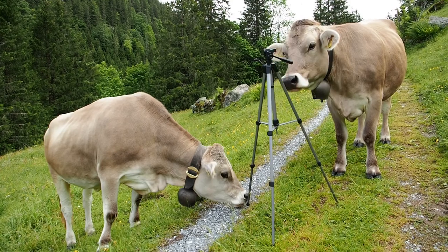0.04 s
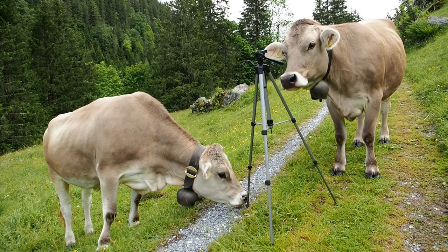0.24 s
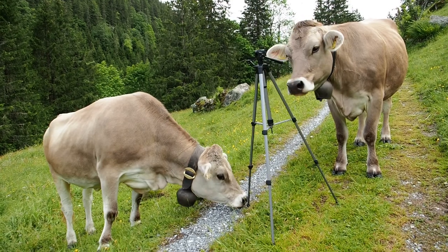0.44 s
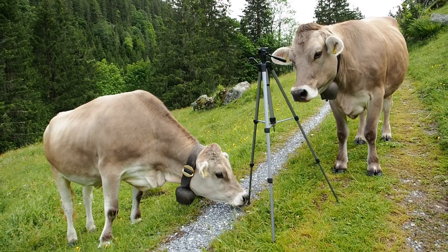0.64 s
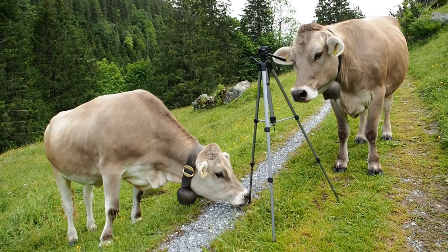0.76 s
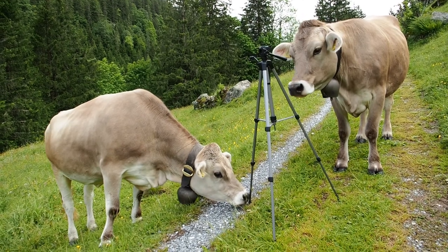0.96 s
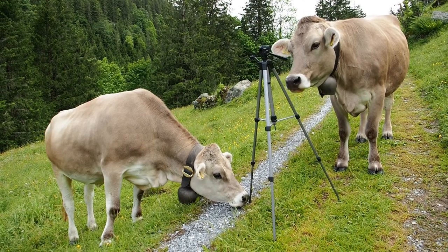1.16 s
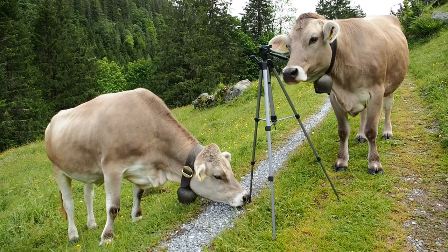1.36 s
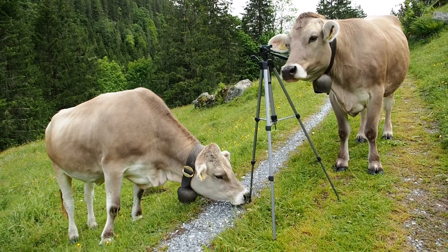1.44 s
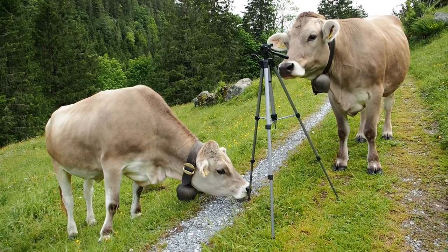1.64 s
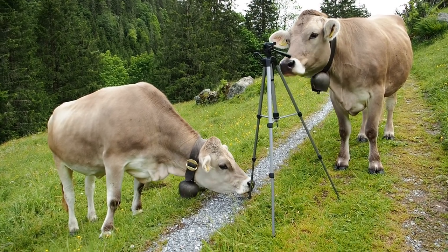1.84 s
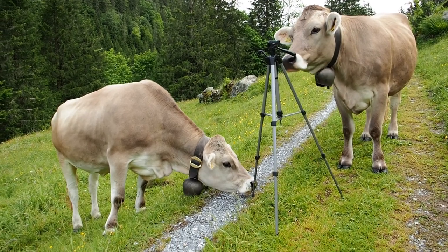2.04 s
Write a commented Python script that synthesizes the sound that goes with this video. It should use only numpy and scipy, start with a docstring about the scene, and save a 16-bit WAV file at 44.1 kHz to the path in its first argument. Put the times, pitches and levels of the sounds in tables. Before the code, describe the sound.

Close by on an open pasture, a cowbell on a grazing cow gives six irregular clangs, the first ones strongest. Its clear ring lingers and fades over faint rustling grass, a light clapper tick and soft outdoor air.

```python
"""Cowbell on a mountain pasture

A sheet-metal bell swings on a grazing cow's neck, close by and a little to the right. The clapper lands
six times, each time on another spot: a knock, a beating hum, long clear partials and a bright shimmer.
A faint tick follows, and the muzzle rustles in the grass. A gain control ducks the soft rush of
open air at the first clang and slowly lets it back."""
import sys
import numpy as np
from scipy import signal
from scipy.fft import rfft, irfft
from scipy.io import wavfile
from scipy.ndimage import uniform_filter1d, minimum_filter1d

SR = 44100
rng = np.random.default_rng(int(sys.argv[2]) if len(sys.argv) > 2 else 0)


def generate_wav(signal):
    """Clip the signal to [-1, 1] and save it as 16-bit WAV at the path in sys.argv[1]."""
    frames = np.transpose(np.atleast_2d(signal))
    scaled = np.clip(frames, -1, 1) * 32767
    pcm = np.round(scaled).astype(np.int16)
    wavfile.write(sys.argv[1], SR, pcm)


N = 92610
T = np.arange(N) / SR

# Colour of the open air: (frequency [Hz], density [dB])
AIR_SPECTRUM = [(25, -17), (60, -4), (150, -2), (220, -3), (320, -11), (800, -8), (1600, -12),
                (3200, -16.5), (6000, -28), (10000, -34), (16000, -35)]
# The muzzle's pushes through the grass: (centre time [s], half-length [s], level [dB])
GRASS_RUSTLES = [(.078, 0.016, -45.5), (.15, 0.043, -50), (1.366, 0.044, -47), (1.588, 0.024, -48.5),
                 (1.732, 0.04, -51.5), (1.847, .035, -59), (2.085, 0.022, -55)]
# Colour of the grass blades: (frequency [Hz], density [dB])
GRASS_SPECTRUM = [(1500, -27), (3500, 3), (4300, 2), (7000, -4.5), (11500, -5.5), (16000, -19)]
# Clapper blows and how hard each drives the mode families: (time [s], low hum [dB], high hum [dB],
# prime [dB], second [dB], twin [dB], third [dB], edge [dB], shimmer [dB], knock [dB])
CLAPPER_BLOWS = [(0.2087, 0, -0.5, 2.5, 0.5, -19, 3, -12.5, -7.5, 0.5),
                 (0.4251, -5, -2, -0.5, -3.5, -15, -1.5, -11.5, -10.5, 4),
                 (0.6866, -11, -29, -3.5, -7.5, -15.5, -12.5, -15, -24, -18),
                 (0.8803, -20.5, -2, -5.5, -9, -20.5, -12.5, -19.5, -20, -7.5),
                 (1.1307, -9, -10.5, -6.5, -14, -9.5, -3, -13.5, -18, -11),
                 (1.4360, -12, -16.5, -12.5, -18.5, -17.5, -6, -24, -24.5, -27.5)]
# The bell's mode families, in the order of the level columns above: (name)
MODE_FAMILIES = ["low hum", "high hum", "prime", "second", "twin", "third", "edge", "shimmer", "knock"]
# Families that keep their phase from blow to blow: (name)
RINGING_FAMILIES = ["prime", "second", "twin", "third"]
# The bell's modes: (family, frequency [Hz], level [dB], t60 [s], left minus right [dB])
BELL_MODES = [ ("low hum", 448.3, 0, 0.52, -4.5), ("high hum", 463, 0, 0.53, -4.5),
              ("prime", 1150.5, 0, 4.18, 0), ("edge", 1199.6, -6, 2.7, 1), ("shimmer", 1254.5, 1, 0.19, 0),
              ("second", 2135.1, 0, 3.5, 0), ("twin", 2174.5, -1.2, 2.55, 2.6),
              ("knock", 640, -10, 0.018, -1), ("knock", 905, -9.5, 0.015, -1),
              ("knock", 2507, -21.5, 0.11, -2), ("knock", 3313.5, -16, .9, -5),
              ("third", 3377.2, 0, 1.077, -7), ("shimmer", 3930, -14, 0.11, -2),
              ("shimmer", 4134, -12, .09, -2), ("edge", 4633, -5.5, 0.69, -6),
              ("edge", 4756.3, 0, 0.6, -5.5), ("shimmer", 5157, -9.5, 0.37, -4),
              ("edge", 5594, -18, 0.34, -2), ("edge", 6072, -10.5, 0.4, -2),
              ("shimmer", 6361, -13.5, 0.26, 0), ("edge", 7352, -14, 0.25, -2),
              ("shimmer", 7772, -8.5, .27, -2), ("shimmer", 8163, -14, .25, -2),
              ("edge", 8354, -14, 0.2, -2), ("shimmer", 8725, -2, 0.2, -2),
              ("shimmer", 9141, -12, 0.31, -2), ("edge", 8500, -15.5, .28, -2),
              ("edge", 9980, -14.5, 0.33, -2), ("shimmer", 10659, -13.5, 0.3, -2),
              ("edge", 11218, -15.5, 0.27, -2), ("shimmer", 11964, -14.5, 0.27, -2),
              ("shimmer", 12515, -13.5, 0.28, -2), ("shimmer", 15000, -10, 0.26, -2),
              ("shimmer", 14000, -11, .21, -2)]
# Contour of the crowd of high wall modes: (frequency [Hz], level [dB])
SHIMMER_SPECTRUM = [(4900, -2), (6000, 4), (7200, -8), (8600, 7), (10000, -6), (12500, 0.5), (14000, -0.5),
                    (16000, 2)]
# Colour of the clapper's contact: (frequency [Hz], density [dB])
KNOCK_SPECTRUM = [(60, -17), (300, -23.5), (600, -10), (1300, -4), (2800, 1), (4000, -2.5), (6000, -15),
                  (16000, -18)]
# Colour of the brief wash after each contact: (frequency [Hz], density [dB])
WASH_SPECTRUM = [(200, -14), (700, -2.5), (1450, 5), (2000, -6), (3000, -13), (4200, 6), (6000, -6),
                 (16000, -19)]
# Colour of the clapper grazing the wall: (frequency [Hz], density [dB])
TICK_SPECTRUM = [(300, -23), (1300, 4.5), (3000, 5), (5500, -12), (7500, -3), (9500, -17), (11300, -6.5),
                 (16000, -21)]

ATTACK_S, CLAPPER_PAN_DB = 0.00093, -2.5
HUM_RISE_S, HUM_PHASE_LAG_S = 0.0079, 0.00804
LEFT_LAG_S, MAX_LAG_RAD = 0.000055, 1.29   # high modes radiate from all over the wall: the lag levels off
SWING_DB, SWING_PER_S = 0.72, 2.54   # the partials waver as the bell turns
SPOT_ABOVE_HZ, SPOT_SPREAD_DB = 5000, 3.5   # high modes depend on the exact spot that is struck
SHIMMER_DB, SHIMMER_SPREAD_DB, SHIMMER_PAN_DB = -15.5, 3.5, -1
SHIMMER_RISE_S, SHIMMER_T60_S = 0.0027, 0.16


def from_db(db):
    """Decibels to gain."""
    return 10 ** (np.asarray(db) / 20)


def level_at(spectrum, hz):
    """Read a spectrum's level in dB along a log-frequency axis."""
    freqs, db = np.transpose(spectrum)
    return np.interp(np.log(hz + 1e-9), np.log(freqs), db)


def pan(db):
    """Left and right gains; a positive level difference leans left."""
    return from_db(np.array([[db], [-db]]) / 2)


def drift(per_s):
    """Random wavering with a spread of about 1."""
    knots = rng.standard_normal(size=4096)
    return np.interp(T * per_s, np.arange(len(knots)), knots)


def noise(spectrum, side_db):
    """Coloured stereo noise with a mid of rms 1; side_db sets the width."""
    gain = from_db(level_at(spectrum, np.arange(N // 2 + 1) * SR / N))
    white = rng.standard_normal((2, N))
    mid, side = irfft(rfft(white) * gain, N) / np.sqrt(np.mean(gain ** 2))
    return mid + from_db(side_db) * side * np.array([[1], [-1]])


def last_blow():
    """For each moment: which blow came last, and how many seconds ago."""
    times = np.array(CLAPPER_BLOWS)[:, 0]
    blow = np.maximum(np.searchsorted(times, T, side="right") - 1, 0)
    return blow, np.maximum(T - times[blow], 0)


def strengths(family):
    """Level of one mode family at each blow, in dB."""
    return np.array(CLAPPER_BLOWS)[:, 1 + MODE_FAMILIES.index(family)]


def envelope(blow_db, t60, rise_s, blow, age):
    """Each blow takes the vibration to a new level, from which it dies away."""
    pole = np.exp(-1 / (rise_s * SR))
    decay = from_db(blow_db)[blow] * from_db(-60 * age / t60) * (age > 0)
    return signal.lfilter([1 - pole], [1, -pole], decay + 1e-18)


def open_air(level_db=-37.5, swell_db=1.05):
    """A soft bed of outdoor rush, wavering slightly."""
    return from_db(level_db + swell_db * drift(per_s=6.7)) * noise(AIR_SPECTRUM, side_db=-7.5)


def lingering_ring(hz=1145, level_db=-40):
    """The bell's prime is still ringing faintly before the first blow."""
    return from_db(level_db) * np.sin(2 * np.pi * hz * T) * (T < CLAPPER_BLOWS[0][0])


def grass(crackle_db=3):
    """The grazing muzzle stirs the blades in short, crackly rustles."""
    pushes = sum(from_db(db) * np.exp(-0.5 * ((T - centre) / half) ** 2)
                 for centre, half, db in GRASS_RUSTLES)
    crackle = from_db(crackle_db * drift(per_s=420))
    return pushes * crackle * noise(GRASS_SPECTRUM, side_db=0)


def bell_partials(blow, age):
    """The struck wall's modes: long ones ring on through the blows, short ones start afresh."""
    out = np.zeros((2, N))
    for family, hz, db, t60, pan_db in BELL_MODES:
        clock = T if family in RINGING_FAMILIES else age
        rise_s = ATTACK_S
        if "hum" in family:   # the hum blooms just after the contact
            clock, rise_s = age - HUM_PHASE_LAG_S, HUM_RISE_S
        polarity = -1 if family == "low hum" else 1   # the two hums start opposed, then swell and beat
        left_lag = min(2 * np.pi * hz * LEFT_LAG_S, MAX_LAG_RAD)
        tone = polarity * np.sin(2 * np.pi * hz * clock - np.array([[left_lag], [0]]))
        swing = from_db(SWING_DB * np.array([drift(SWING_PER_S), drift(SWING_PER_S)]))
        spot_db = SPOT_SPREAD_DB * rng.standard_normal(len(CLAPPER_BLOWS)) * (hz > SPOT_ABOVE_HZ)
        ring = envelope(strengths(family) + db + spot_db, t60, rise_s, blow, age)
        out += pan(pan_db) * swing * tone * ring
    return out


def bell_shimmer(blow, age, count=100):
    """Closely packed high wall modes sparkle, each with a strength of its own at every blow."""
    out = np.zeros((2, N))
    low_hz, high_hz = SHIMMER_SPECTRUM[0][0], SHIMMER_SPECTRUM[-1][0]
    for k in range(count):
        hz = low_hz + (high_hz - low_hz) * (k + rng.random()) / count
        spot_db = SHIMMER_SPREAD_DB * rng.standard_normal(len(CLAPPER_BLOWS))
        blow_db = strengths("shimmer") + SHIMMER_DB + level_at(SHIMMER_SPECTRUM, hz) + spot_db
        t60 = SHIMMER_T60_S * np.exp(0.11 * rng.standard_normal())
        tone = np.sin(2 * np.pi * (hz * T + rng.random((2, 1))))   # its own phase in each ear
        position = pan(SHIMMER_PAN_DB + 2 * rng.standard_normal())
        out += position * tone * envelope(blow_db, t60, SHIMMER_RISE_S, blow, age)
    return out


def clapper_knock(blow, age, knock_db=2, knock_t60=0.019, wash_db=-13.5, wash_t60=0.27):
    """The clapper hits the wall: a dry knock with a short wash of noise for a tail."""
    knock = envelope(strengths("knock") + knock_db, knock_t60, ATTACK_S, blow, age)
    wash = envelope(strengths("shimmer") + wash_db, wash_t60, ATTACK_S, blow, age)
    contact = knock * noise(KNOCK_SPECTRUM, side_db=-9) + wash * noise(WASH_SPECTRUM, side_db=-6)
    return pan(CLAPPER_PAN_DB) * contact


def clapper_tick(start_s=1.9635, level_db=-26, t60=0.046):
    """The clapper grazes the wall once, lightly."""
    age = np.maximum(T - start_s, 0)
    decay = from_db(level_db - 60 * age / t60) * (T > start_s)
    return pan(CLAPPER_PAN_DB) * decay * noise(TICK_SPECTRUM, side_db=-1)


def scene():
    """The bell up front, over the grazing and the open air."""
    blow, age = last_blow()
    bell = lingering_ring() + bell_partials(blow, age) + bell_shimmer(blow, age)
    clapper = clapper_knock(blow, age) + clapper_tick()
    return bell + clapper + grass() + open_air()


def gain_control(x, threshold_db=-8, detect_s=0.0084, hold_s=0.47, release_db_per_s=6.5):
    """Ducks the mix as soon as it passes the threshold, holds, then eases back up."""
    power = uniform_filter1d(np.mean(x ** 2, axis=0), int(detect_s * SR))
    over_db = np.maximum(10 * np.log10(np.maximum(power, 1e-12)) - threshold_db, 0)
    half_hold = int(hold_s * SR / 2)
    held_db = -minimum_filter1d(-over_db, 2 * half_hold + 1, origin=half_hold, mode="constant")
    release_db = release_db_per_s * T
    duck_db = np.maximum.accumulate(held_db + release_db) - release_db
    return x * from_db(-duck_db)


def record(dry):
    """Gain control, clipping at full scale, and a steep top cut at 16 kHz."""
    clipped = np.clip(gain_control(dry), -1, 1)
    top_cut = signal.ellip(10, 0.1, 80, 16000, fs=SR, output="sos")
    return signal.sosfilt(top_cut, clipped)


dry = scene()
out = record(dry)
generate_wav(out)
```